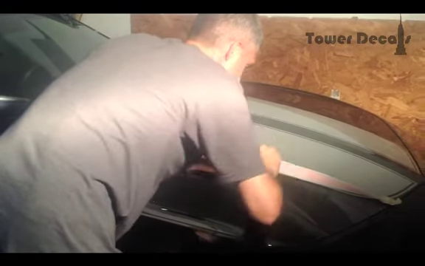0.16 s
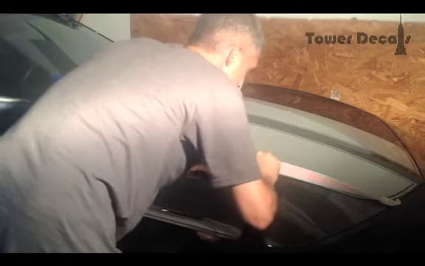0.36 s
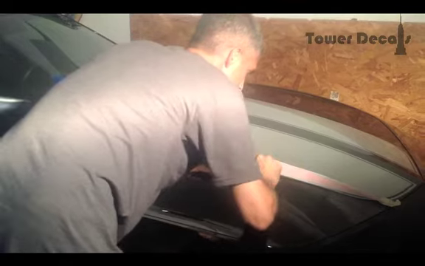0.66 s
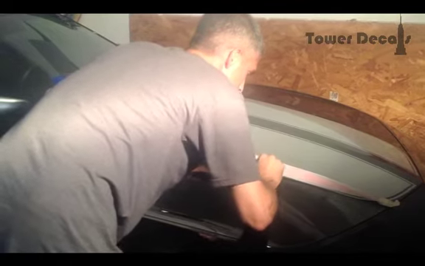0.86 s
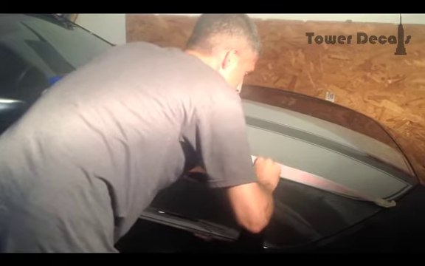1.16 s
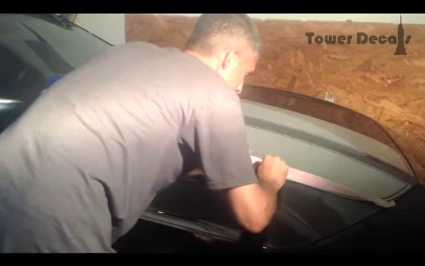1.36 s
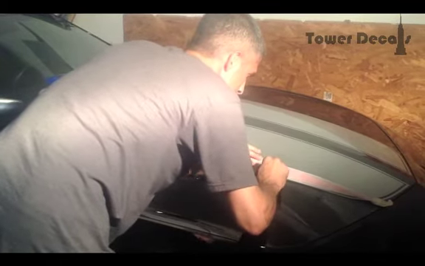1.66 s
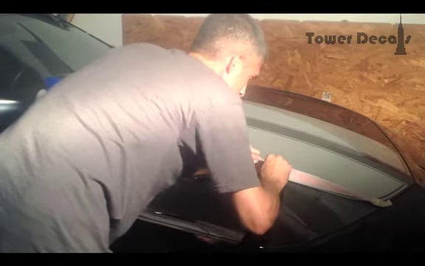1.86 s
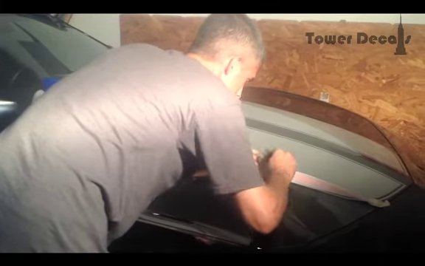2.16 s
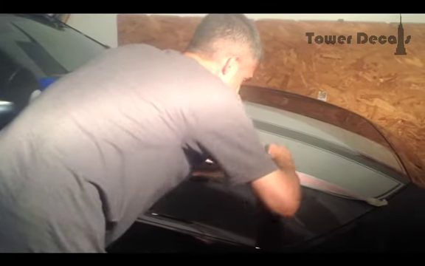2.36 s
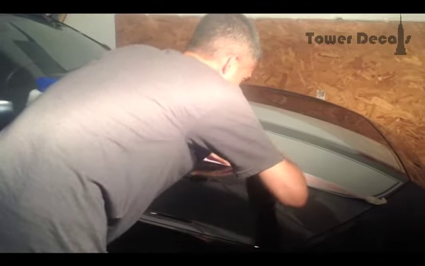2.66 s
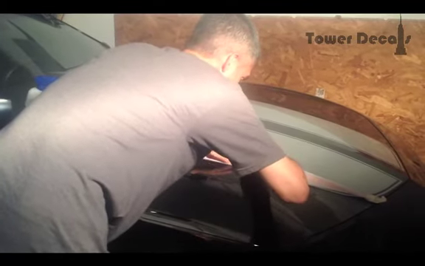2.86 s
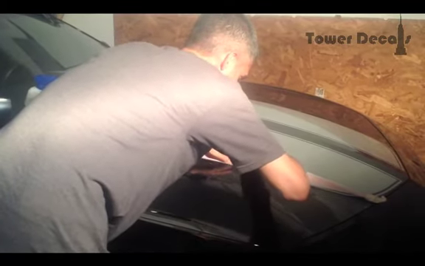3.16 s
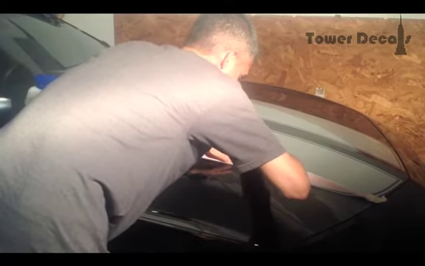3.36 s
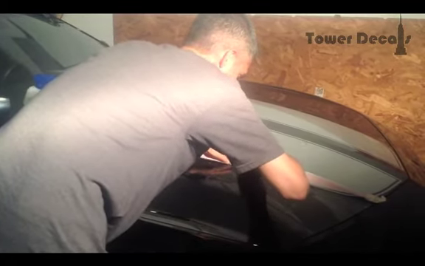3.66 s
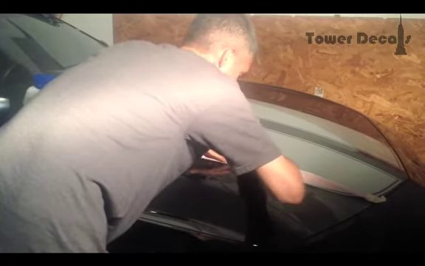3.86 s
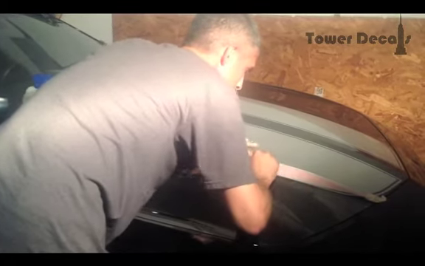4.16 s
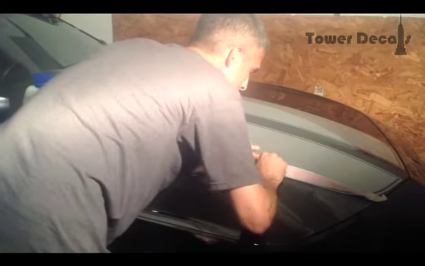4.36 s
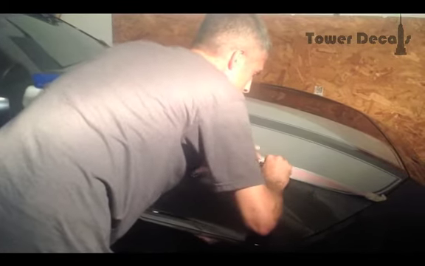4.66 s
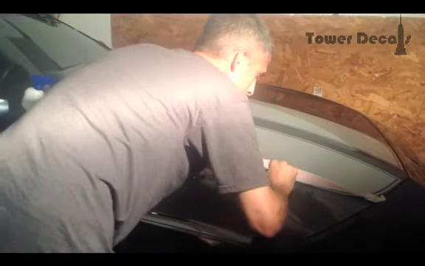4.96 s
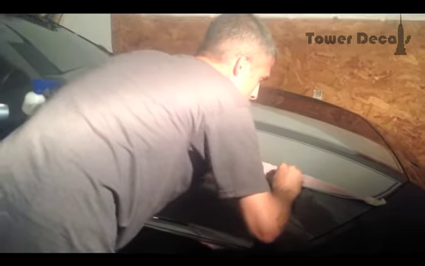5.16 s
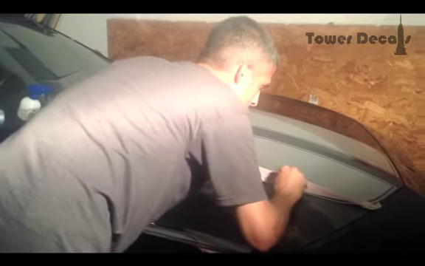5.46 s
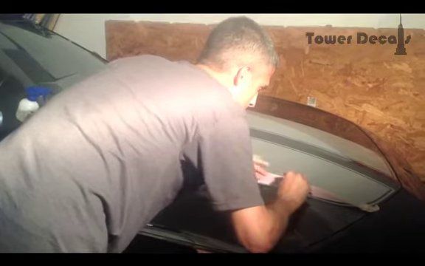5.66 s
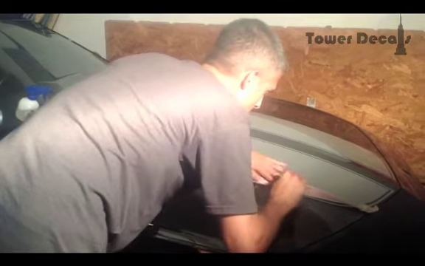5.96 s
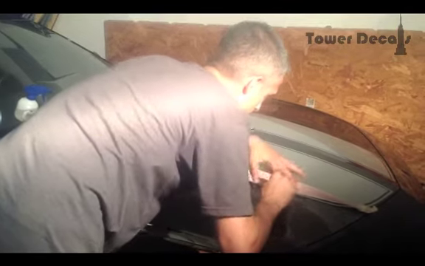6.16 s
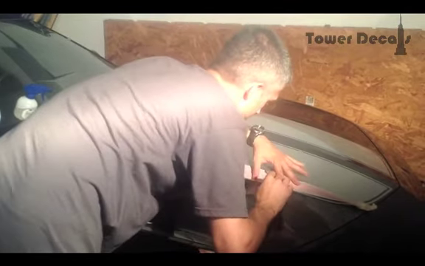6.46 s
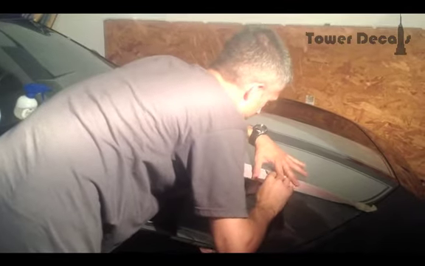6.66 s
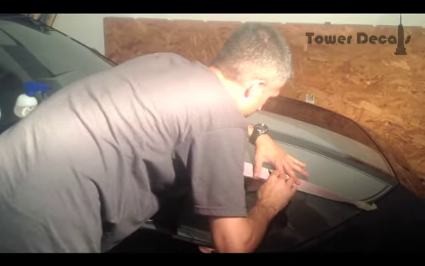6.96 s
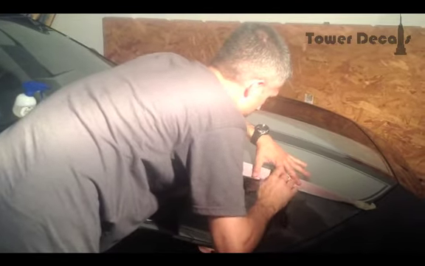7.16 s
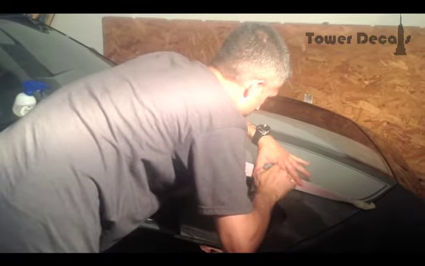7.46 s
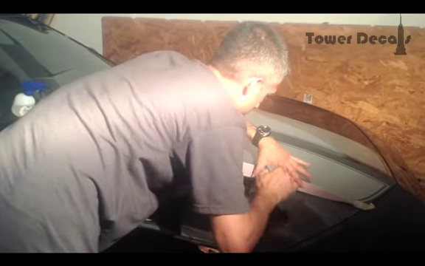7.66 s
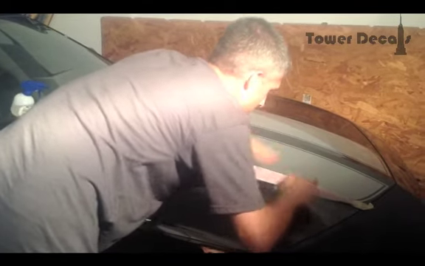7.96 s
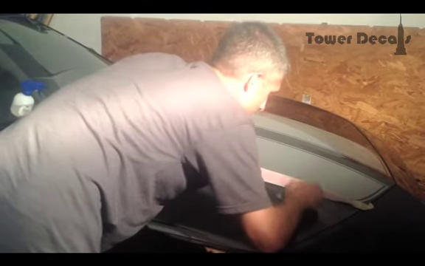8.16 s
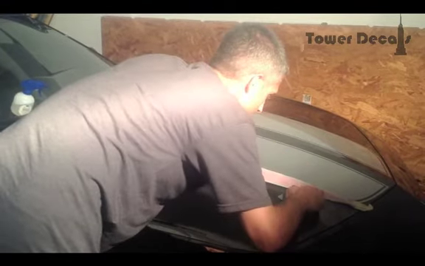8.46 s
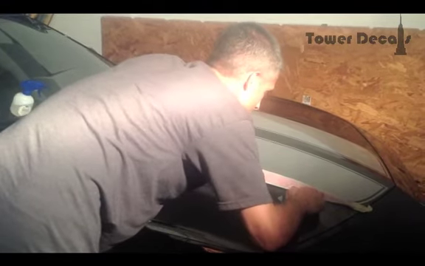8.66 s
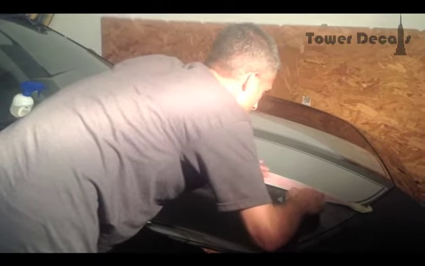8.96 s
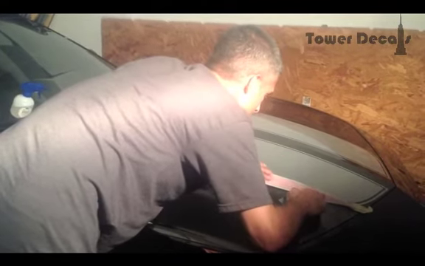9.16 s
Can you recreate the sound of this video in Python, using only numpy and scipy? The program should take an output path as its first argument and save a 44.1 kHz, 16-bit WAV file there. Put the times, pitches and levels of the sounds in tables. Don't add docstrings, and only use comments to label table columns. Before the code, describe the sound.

In a garage, short wet scraping strokes with light knocks and snaps give way to a deep truck drone rising, peaking and receding.

```python
import sys
import numpy as np
from scipy import signal
from scipy.fft import rfft, irfft
from scipy.io import wavfile
from scipy.ndimage import uniform_filter1d, map_coordinates

SR = 44100
rng = np.random.default_rng(int(sys.argv[2]) if len(sys.argv) > 2 else 0)


def volts(x):
    e = np.asarray(x, float) / 20
    return 10 ** e


def int16_out(signal):
    q = np.round(np.clip(np.atleast_2d(signal).T, -1, 1) * 32767)
    wavfile.write(sys.argv[1], SR, q.astype(np.int16))


N = 410115


def read(points, hz):
    f, value = np.transpose(points)
    return np.interp(np.log(hz + 1), np.log(f + 1), value)


def curve(rows):
    s, *columns = np.transpose(rows)
    return [np.interp(np.arange(N) / SR, s, c) for c in columns]


def evened(x):
    return x / np.sqrt(np.mean(x ** 2) + 1e-20)


def add(mix, s, sound):
    part = mix[max(round(s * SR), 0):][:len(sound)]
    part += sound[:len(part)]


def coloured(x, colour):
    gain = volts(read(colour, np.fft.rfftfreq(len(x), 1 / SR)))
    return evened(irfft(rfft(x) * gain, len(x)))


def wash(colour, patchy_db, size=1024):
    frames, hz = 4 * N // size + 5, np.fft.rfftfreq(size, 1 / SR)
    a, b, patches = rng.standard_normal((frames, len(hz), 3)).T
    patches = uniform_filter1d(patches, size=8, axis=0)
    patches = evened(uniform_filter1d(patches, size=16, axis=1))
    z = (a + 1j * b) * volts(read(colour, hz)[:, None] + patchy_db * patches)
    return evened(signal.istft(z, nperseg=size, noverlap=3 * size // 4)[1][:N])


def grit(per_s, spread_db):
    size = volts(spread_db * np.minimum(rng.exponential(1, N), 3))
    return size * rng.standard_normal(N) * (rng.random(N) < per_s / SR)


def passing(t, start, end, db, rise, fall):
    return volts(db - rise * np.maximum(start - t, 0) - fall * np.maximum(t - end, 0))


def microphone_hiss():
    # frequency in Hz, level in dB per Hz.
    self_noise = [(6000, -30), (10000, -8), (13000, 2), (16000, 0)]
    return volts(-82) * coloured(rng.standard_normal(N), self_noise)


def drones():
    # start in seconds, end in seconds, frequency in Hz, bandwidth in Hz, level in dB.
    tones = [(0, 0.81, 165, 10.7, -49.5), (0.5, 1.9, 290, 7.4, -62.5), (1.17, 1.4, 817, 84, -51.5),
             (0.1, 2.5, 1000, 35, -62.5), (2.4, 3.55, 1200, 36, -64), (5.7, 6.3, 91, 22, -56),
             (7.5, 8.9, 1160, 17, -66.5), (6.75, 7.5, 1245, 17, -58.5), (7.9, 9.1, 800, 22, -68),
             (4.5, 5.87, 665, 16, -59), (2.5, 6.2, 800, 22, -62), (6.0, 7.0, 1670, 20, -65),
             (8.6, 9.25, 390, 110, -64), (1.24, 4.8, 260, 5.9, -57.5), (2.2, 2.3, 160, 8.7, -50.5),
             (3.3, 3.9, 97, 20, -64), (4.0, 4.3, 130, 16, -45), (3.5, 6.13, 658, 105, -54),
             (3.5, 6.8, 787, 41, -55.5), (4.5, 8.1, 1730, 28, -62.5), (6, 9.1, 1220, 80, -68),
             (7.4, 8.85, 755, 62, -63), (5.6, 6.1, 495, 100, -50), (7.5, 8.7, 2300, 1600, -66.5),
             (5.36, 5.56, 4200, 600, -61), (5.87, 6.14, 4200, 700, -57), (4.2, 4.45, 176, 24, -38),
             (6, 7.4, 1745, 34, -58.5), (5.9, 6.5, 1200, 36, -57), (5.1, 5.6, 272, 22, -39.5),
             (7.4, 7.85, 2360, 1000, -62), (8.05, 8.23, 15000, 2600, -72), (5.9, 7.26, 540, 15, -58),
             (6.5, 8.3, 727, 14, -62.5), (6.5, 8.7, 845, 14, -63.5), (3.3, 4.16, 665, 30, -57.5),
             (3.65, 3.92, 730, 30, -56), (4.35, 4.65, 650, 25, -57.5), (4.83, 5.0, 790, 40, -50),
             (2.2, 2.65, 210, 33, -52)]
    out = np.zeros(N)
    for start, end, hz, width, db in tones:
        size = round((end - start) * SR)
        b, a = signal.iirpeak(hz, hz / width, SR)
        noise = rng.standard_normal(size + SR // 4)
        tone = signal.lfilter(b, a, signal.lfilter(b, a, noise))[-size:]
        add(out, start, volts(db) * evened(tone) * signal.windows.tukey(size, .6))
    return out


def street():
    # frequency in Hz, level in dB per Hz.
    rumble_colour = [(15, -93), (25, -57), (32, -66), (70, -23), (91, -27.5), (112, -18.5), (177, -2.5),
                     (229, -5.5), (277, -13.5), (325, -22), (404, -16.5), (450, -25), (580, -55),
                     (990, -120)]
    roar_colour = [(180, -32), (300, 0.5), (372, -3.5), (407, -9.5), (451, -5), (786, -2), (861, -3.5),
                   (1210, -9.5), (1680, -9), (1950, -16), (2500, -17), (3390, -24.5), (4500, -26.5),
                   (5850, -46), (9900, -120)]
    leaving_colour = [(190, -35), (330, 2), (345, -7.5), (443, -8), (522, -18), (725, -15.5), (1090, -22),
                      (1240, -15.5), (1380, -21), (1740, -20), (1900, -23), (2580, -27), (4500, -42),
                      (5850, -69), (9900, -120)]
    hiss_colour = [(2060, -8), (3500, -5), (4140, -3.5), (4930, -4.5), (6520, -2.5), (7860, -8),
                   (9070, -7.5), (12700, -13), (15500, -14)]
    # time in seconds, share of the roar heard from behind the truck.
    leaving = [(0, 0.0064), (6.0, 0.22), (6.9, 0.96), (8.5, 0.96), (9.3, 0.51)]
    # time in seconds, level in dB over the idle street.
    traffic = [(0, 0), (1.9, -0.3), (3.1, -2), (3.8, 2.5), (4.56, 5.5), (5.5, 7), (6.9, 9), (7.92, 1.3),
               (8.3, -1.2), (9.3, -8)]
    # start in seconds, end in seconds, rumble in dB, rise in dB/s, fall in dB/s.
    surges = [
        (2.35, 2.9, -49, 29, 14),
        (4.305, 4.556, -36, 15, 15),
    ]

    t = np.arange(N) / SR
    share = np.clip(curve(leaving)[0], 0, 1)
    near_db = curve(traffic)[0]
    rumble_gain = volts(-49.5 + near_db - 3.7 * share)
    roar_gain = volts(-50.5 + 0.91 * near_db - 0.1 * share)
    hiss_gain = volts(-63.5 + 0.84 * near_db - 3.4 * share)
    rumble_gain = np.sqrt(rumble_gain ** 2 + sum(passing(t, *row) ** 2 for row in surges))
    hiss_late_s = 0.4
    hiss_gain = np.interp(t - hiss_late_s * (t < 6), t, hiss_gain)

    rumble = rumble_gain * wash(rumble_colour, patchy_db=-0.5, size=4096)
    roar = np.sqrt(1 - share) * wash(roar_colour, patchy_db=2.)
    roar = roar + np.sqrt(share) * wash(leaving_colour, patchy_db=1.5)
    hiss = hiss_gain * wash(hiss_colour, patchy_db=1.3)
    return rumble + roar_gain * roar + hiss + drones()


def strokes(ring_hz=6050, ring_width=1300, split_hz=10500):
    # middle in seconds, length in seconds, swish in dB.
    pushes = [(0.551, 0.079, -57), (0.776, 0.079, -53), (1.02, 0.082, -52.5), (1.154, 0.088, -56.5),
              (1.319, 0.077, -57.5), (1.445, 0.098, -60), (1.607, 0.11, -69.5), (1.858, 0.11, -55.5),
              (2.429, 0.19, -71), (2.625, 0.084, -60), (2.829, 0.14, -62.5), (3.061, 0.062, -58.5),
              (3.264, 0.045, -56), (3.358, 0.055, -70), (3.464, 0.042, -58), (3.571, 0.058, -59),
              (3.668, 0.083, -58.5), (4.814, 0.085, -57.5), (5.066, 0.087, -54.5)]
    pulls = [(0.653, 0.065, -58), (0.888, 0.076, -55), (1.73, 0.071, -60), (2.005, 0.11, -59.5),
             (2.534, 0.05, -67), (2.968, 0.053, -64), (3.155, 0.039, -61), (4.579, 0.077, -62),
             (4.687, 0.075, -66.1), (4.919, 0.086, -56.5), (5.19, 0.1, -56)]
    flicks = [(0.115, 0.13, -70), (4.345, 0.043, -63.5), (6.42, 0.033, -56.7), (8.119, 0.11, -74),
              (8.398, 0.11, -80), (8.978, 0.02, -65)]
    sweeps = [(5.428, 0.25, -49), (6.005, 0.26, -45)]
    # frequency in Hz, level in dB per Hz.
    swish_colour = [(2650, -8.5), (4500, -6.5), (4860, -8), (6700, -5.5), (7950, -5.5), (9330, -3.5),
                    (11000, -7.5), (14700, -4), (15500, -13)]
    kinds = ((pushes, (-.6, 3.3)), (pulls, (.4, -2)), (flicks, (-12, -14)), (sweeps, (-3, 3)))
    usual_db = -60
    ring_lag, rustle_lag = 0.3, 0.79

    swish, fizz, ring, rustle = np.zeros((4, N))
    rows = [(*row, *kind) for table, kind in kinds for row in table]
    for s, length, db, ring_db, rustle_db in rows:
        ring_db = ring_db - ring_lag * (db - usual_db)
        rustle_db = rustle_db - rustle_lag * (db - usual_db)
        edge = 0.047 + 0.26 * length
        span = length + 0.9 * edge
        speed = volts(db) * signal.windows.tukey(round(span * SR), min(2 * edge / span, 1)) ** 0.86
        wet_db = 48 * length * np.linspace(.3, -.7, len(speed))
        for mix, share_db in ((swish, 0), (fizz, wet_db), (ring, ring_db - 2.5), (rustle, rustle_db)):
            add(mix, s - span / 2, speed * volts(share_db))

    blade = [(ring_hz - 2 * ring_width, -30), (ring_hz - ring_width / 2, -4), (ring_hz, 0),
             (ring_hz + ring_width / 2, -4), (ring_hz + 2 * ring_width, -30)]
    sheet = [(500, -21), (900, 1.5), (2200, -1.0), (3300, -10.0), (4200, -9.0), (4800, -23), (5800, -23)]
    film = coloured(grit(14000, spread_db=-0.5), swish_colour)
    grip = uniform_filter1d(abs(film), size=700)
    clumps = volts(1.23 * evened(grip - grip.mean()))
    low = signal.sosfiltfilt(signal.butter(2, split_hz, fs=SR, output="sos"), film)
    film_sound = swish * low + fizz * (film - low)
    blade_sound = ring * coloured(grit(8000, spread_db=1.0), blade)
    sheet_sound = rustle * coloured(grit(6000, spread_db=1.0), sheet)
    return clumps * (film_sound + blade_sound + sheet_sound)


def knocks():
    # time in seconds, peak in dB, blade note in Hz, hood in dB, tick in dB re peak.
    impacts = [(.316, -41, 1550, 13, -17), (.328, -46, 420, 18, -30), (.380, -48, 750, 10, -30),
               (2.80, -42, 977, 0, -14), (3.048, -49, 780, 17, -15), (3.244, -51, 2350, 20, -4),
               (3.256, -46, 2050, 16, -14), (3.458, -44, 1150, 14, -12), (.762, -43, 2500, -6, -20),
               (4.255, -41, 2400, 2, -16), (8.968, -48, 680, 11, -40)]
    # frequency in Hz, level in dB, 60 dB decay time in seconds.
    hood_modes = [(308, -2.5, 0.2), (416, -4.5, 0.17), (779, -0.5, .15), (1144, -5.5, 0.19), (1430, -9, .1)]
    out, t = np.zeros(N), np.arange(6000) / SR
    band = signal.butter(2, [350, 1800], "band", fs=SR, output="sos")
    noises = rng.standard_normal((len(impacts), len(t)))
    for (s, db, hz, hood_db, tick_db), noise in zip(impacts, noises):
        hood = sum(volts(d - 60 * t / t60) * np.sin(2 * np.pi * f * t) for f, d, t60 in hood_modes)
        rattle = evened(signal.sosfilt(band, noise))
        hood = volts(-1.5) * hood + volts(-6.0 - 60 * t / 0.18) * rattle
        blade = volts(-60 * t / 0.026) * np.sin(2 * np.pi * hz * t)
        tick = volts(tick_db - 60 * t / 0.0072) * np.diff(noise, prepend=0)
        add(out, s, volts(db) * (volts(hood_db - 13.5) * hood + blade + tick))
    return out


def snaps():
    # time in seconds, peak in dB, pitch in Hz, crackle in dB.
    releases = [(1.002, -37, 5940, 2), (2.6124, -45, 10900, 2), (3.245, -43, 5570, 0),
                (4.338, -45, 13000, 5), (5.310, -30.5, 11500, 15), (5.9344, -36, 10800, 0),
                (6.085, -33, 6340, -6), (6.3844, -40, 7300, 0), (6.4173, -36, 10500, 12),
                (6.4644, -43, 2590, -7), (8.9675, -53, 7000, 2), (8.970, -45, 14500, 2),
                (8.979, -56, 14500, 0)]
    out, t = np.zeros(N), np.arange(600) / SR
    noises = rng.standard_normal((len(releases), 602))
    for (s, db, hz, crack_db), noise in zip(releases, noises):
        crack = np.sin(2 * np.pi * hz * t) + 0.26 * volts(crack_db) * np.diff(noise, 2)
        decay = volts(db - 60 * t / 0.004)
        onset = np.minimum(t / 0.00047, 1)
        add(out, s, decay * crack * onset)
    return out


def garage(x, t60=0.8):
    taps = np.zeros(SR // 2)
    at = np.arange(150, len(taps) - 20, 20)
    taps[at + rng.integers(0, 20, len(at))] = rng.choice([-1., 1.], len(at))
    taps *= volts(-60 * np.arange(len(taps)) / SR / t60)
    return signal.oaconvolve(x, taps / np.linalg.norm(taps))[:N]


def gap_levels(t, path_hz):
    # resonance in Hz, opening in seconds, shutting in seconds, level in dB, slope in dB/s.
    gaps = [(97, 5.9, 10, -59, 24), (97, 5.8, 7.13, -33, 25), (120, 5.3, 10, -51.5, 24),
            (120, 5.22, 5.34, -37, 34), (120, 6.14, 7.22, -34, 26.5), (185, 4.53, 5.26, -31, 23),
            (185, 5.96, 5.6, -42, 21), (185, 6, 6.76, -47, 17.5), (185, 8.1, 8.96, -50.5, 11),
            (235, 4.7, 4.1, -68, 26), (235, 6.175, 7.19, -30, 22), (235, 6.99, 6.87, -27.5, 52),
            (235, 7.9, 8.09, -43.5, 15.5), (280, 3.8, 8.37, -47.5, 18), (280, 5.43, 5.65, -39.5, 24),
            (308, 5.1, 8, -48, 17), (308, 8.55, 8.75, -45, 18), (325, 4.4, 7.22, -48, 11)]
    power = np.zeros((len(path_hz), len(t)))
    for f, start, end, db, slope in gaps:
        nearest = np.argmin(abs(np.subtract(path_hz, f)))
        power[nearest] += passing(t, start, end, db, slope, slope) ** 2
    return 10 * np.log10(power)


def fleeting_db(t, order):
    # middle in seconds, length in seconds, multiple of the cycle, level in dB.
    lifts = [(4.55, 0.35, 17, 8), (4.55, 0.6, 21, 12), (4.65, 0.35, 19, 8), (4.85, 0.2, 21, 8),
             (4.85, 0.35, 23, 12), (5.05, 1.6, 20, 8), (5.15, 0.35, 20, 8), (5.25, 0.2, 24, 5),
             (5.25, 1, 25, 8), (5.55, 0.35, 22, 8), (5.55, 0.6, 31, 12), (5.65, 0.6, 15, 5),
             (5.75, 1.6, 18, 5), (5.85, 1, 20, 3), (5.85, 1, 29, 8), (5.95, 0.6, 13, 5), (6.15, 0.2, 17, 8),
             (6.25, 0.6, 22, 8), (6.35, 0.6, 29, 12), (6.35, 0.6, 32, 12), (6.45, 0.35, 26, 12),
             (6.45, 1, 21, 8), (6.45, 1.6, 37, 5), (6.65, 0.35, 18, 5), (6.75, 1.6, 15, 3),
             (6.85, 0.2, 19, 5), (6.95, 0.35, 25, 12), (7.05, 1.6, 36, 5), (7.25, 1, 26, 5),
             (7.45, 0.6, 17, 5), (7.55, 0.35, 15, 5), (7.65, 0.6, 25, 5), (7.65, 0.6, 27, 8),
             (7.75, 0.6, 22, 8), (7.85, 1, 24, 5), (8.15, 0.2, 19, 5), (8.35, 1.6, 14, 3),
             (8.45, 0.6, 16, 5), (8.65, 0.2, 15, 8), (8.85, 0.6, 17, 12), (8.85, 0.6, 23, 8),
             (8.85, 1.6, 21, 3)]
    cancels = [(4.55, 0.2, 15, -12), (4.75, 0.6, 22, -8), (5.05, 0.6, 15, -8), (5.15, 0.2, 23, -18),
               (5.25, 0.2, 22, -8), (5.25, 1, 19, -12), (5.35, 0.2, 16, -5), (5.45, 0.2, 20, -8),
               (5.45, 0.35, 13, -12), (5.45, 1, 21, -8), (5.55, 0.35, 24, -5), (5.55, 1.6, 23, -5),
               (5.85, 0.35, 26, -18), (5.95, 0.35, 19, -3), (6.05, 0.35, 35, -18), (6.05, 0.6, 16, -5),
               (6.05, 1.6, 14, -8), (6.45, 1.6, 25, -5), (6.75, 0.35, 20, -8), (6.85, 1.6, 28, -8),
               (6.95, 0.6, 29, -12), (7.05, 0.35, 33, -18), (7.15, 0.6, 22, -5), (7.25, 0.35, 15, -8),
               (7.25, 0.35, 24, -12), (7.35, 0.6, 21, -8), (7.35, 1, 18, -5), (7.45, 0.6, 31, -12),
               (7.65, 0.35, 23, -12), (7.85, 0.6, 19, -5), (7.95, 0.6, 15, -5), (8.15, 0.6, 17, -8),
               (8.25, 0.6, 22, -18), (8.35, 0.35, 23, -8), (8.45, 0.35, 20, -18), (8.65, 0.35, 22, -8),
               (8.65, 1, 24, -12), (9.15, 1, 26, -18)]
    loading = [(4.35, .5, 17, 10), (4.35, .45, 18, 9), (4.3, .4, 22, 10), (4.15, .3, 13, 8),
               (4.35, .3, 19, -12), (7.95, .35, 17, -5)]
    further_shifts = [(4.3, 0.25, 15, 12), (4.3, 0.25, 19, -12), (4.3, 0.25, 22, 5), (4.3, 0.7, 21, -8),
                      (4.4, 0.25, 18, -8), (4.45, 0.25, 17, -8), (4.5, 0.4, 14, -12), (4.55, 0.25, 15, -8),
                      (4.6, 0.25, 20, 5), (4.7, 0.25, 16, -3), (4.95, 0.25, 16, 3), (4.95, 0.4, 23, 5),
                      (5.1, 0.25, 18, 3), (5.1, 0.25, 22, 5), (5.3, 0.7, 14, -8), (5.35, 0.25, 16, -3),
                      (5.5, 0.4, 23, 5), (5.8, 0.25, 11, 8), (5.85, 0.7, 18, 3), (5.95, 0.25, 22, -3),
                      (6.3, 0.25, 20, 3), (6.55, 0.25, 16, 5), (6.8, 0.25, 19, 3), (7.05, 0.4, 15, 5),
                      (7.35, 0.4, 20, -3), (7.5, 0.25, 24, 8), (8.7, 0.25, 27, 12)]
    total = np.zeros(len(t))
    for s, length, multiple, shift_db in lifts + cancels + loading + further_shifts:
        if multiple == order:
            total += shift_db * np.exp(-2 * (2 * (t - s) / length) ** 2)
    return total


def route_phase(t, order_hz):
    # start in seconds, extra travel in ms, far echo in ms, echo share.
    routes = [(0, 16.6, 17.4, -.85), (4.78, -.7, 11.2, .85), (5.08, -.3, 4.0, .85),
              (5.38, -7.1, 13.4, -.85), (5.83, -3.3, 4.8, -.85), (6.43, -3.7, 8.0, .85),
              (6.88, -4.4, 21.4, -.85), (7.48, 14.3, 66.8, .85), (7.78, 10.2, 61.4, -.85),
              (8.08, 31.8, 42.2, .85), (8.38, 32.0, 26.6, .85), (8.68, 27.5, 48.2, .85)]
    handover_s = 0.22
    starts = np.array([r[0] for r in routes] + [99])[:, None]
    coarse, hz = t[::16], order_hz[::16]
    begun = np.clip((coarse - starts) / handover_s + .5, 0, 1)
    heard = begun[:-1] - begun[1:]
    ways = np.zeros(len(coarse), complex)
    for weight, (_, ms, far_ms, share) in zip(heard, routes):
        travel = np.exp(-2j * np.pi * hz * ms / 1000)
        far = np.exp(-2j * np.pi * hz * far_ms / 1000)
        ways += weight * travel * np.exp(1j * np.angle(1 + share * far))
    return np.interp(t, coarse, ways / np.maximum(abs(ways), .5))


def engine(fading_db=1, turn=.19, echo=.5, drift=.008):
    # time in seconds, cycle rate in Hz.
    cycle = [(3.8, 9.594), (4.6, 10.694), (4.8, 10.911), (5.0, 11.24), (5.5, 11.73), (6.15, 12.095),
             (6.57, 12.075), (6.85, 12.2), (7.35, 12.24), (7.65, 12.3), (8.0, 12.11), (8.25, 11.89),
             (9.3, 11.39)]
    # multiple of the cycle, level in dB.
    exhaust = [(8, -7.0), (9, -19.0), (10, 0.0), (11, 13.0), (12, 5.0), (13, 6.0), (14, -2.5), (15, 0.0),
               (16, -3.0), (17, -16.0), (18, -11.0), (19, -1.0), (20, -5.0), (21, -0.5), (22, 8.0),
               (23, 7.0), (24, 10.0), (25, 3.5), (26, 3.0), (27, 0.0), (28, -10.0), (29, -2.0), (30, -2.0),
               (31, -4.0), (32, -4.0), (33, -6.0), (34, -8.0), (35, -8.0), (36, -6.0), (37, -6.0)]
    # frequency in Hz, level in dB.
    resonances = [(110, -8.0), (140, -26.0), (172, 2.0), (184, 9.0), (196, 11.0), (215, 8.0), (230, 4.0),
                  (244, 6.0), (258, -8.0), (272, -7.0), (290, -17.0), (308, -3.0), (330, -14.0),
                  (450, -11.0)]
    path_hz = [97, 120, 185, 235, 280, 308, 325]
    # time in seconds, lag in ms.
    wall_lag = [(4.85, 17.4), (5.15, 14.7), (5.8, 14.8), (6.3, 17.7), (6.7, 17), (6.9, 14.4), (7.3, 14.8),
                (7.95, 16.7), (8.15, 16), (8.35, 13.1)]
    pipe_nodes = [12, 16, 19, 20, 22]

    step = 32
    hz, lag_ms = curve(cycle)[0][::step], curve(wall_lag)[0][::step]
    t = np.arange(len(hz)) * step / SR
    paths = gap_levels(t, path_hz)
    cycles = np.cumsum(hz) * step / SR + turn
    fading_hz, wander_hz = np.geomspace(.5, 3, 6), np.geomspace(.3, 1.5, 6)
    out = np.zeros(len(t))
    for (k, db), chance in zip(exhaust, rng.random((len(exhaust), 7))):
        order_hz = k * hz
        place = np.interp(np.log(order_hz), np.log(path_hz), np.arange(len(path_hz)))
        path_db = map_coordinates(paths, [place, np.arange(len(t))], order=1)
        fading = sum(np.sin(2 * np.pi * (f * t + p)) for f, p in zip(fading_hz, chance[1:])) / np.sqrt(3)
        wander = sum(np.cos(2 * np.pi * (f * t + p)) for f, p in zip(wander_hz, chance[:0:-1]))
        comb = abs(1 + echo * np.exp(-2j * np.pi * order_hz * lag_ms / 1000))
        flips = np.searchsorted(pipe_nodes, k, "right")
        level_db = db + read(resonances, order_hz) + path_db + fading_db * fading + fleeting_db(t, k)
        rotation = np.exp(2j * np.pi * (k * cycles + flips / 2 + drift * wander))
        out += np.sqrt(2) * comb * volts(level_db) * np.real(route_phase(t, order_hz) * rotation)
    out *= np.clip((t - 3.95) / 0.51, 0, 1)
    return signal.resample_poly(out, step, 1)[:N]


def scene():
    near = strokes() + knocks() + snaps()
    room = volts(-8) * garage(near)
    return (near + room + engine() + street() + microphone_hiss())[None]


def roll_off(x):
    return signal.sosfilt(signal.butter(12, 16300, fs=SR, output="sos"), x)


def record(dry):
    bent = dry + 0.22 * dry ** 2
    thin = signal.sosfilt(signal.butter(2, 46, "high", fs=SR, output="sos"), bent)
    edge = signal.firwin(1023, 15330, window=("kaiser", 9), fs=SR)
    return roll_off(signal.oaconvolve(thin, edge[None], "same"))


dry = scene()
out = record(dry)
int16_out(out)
```